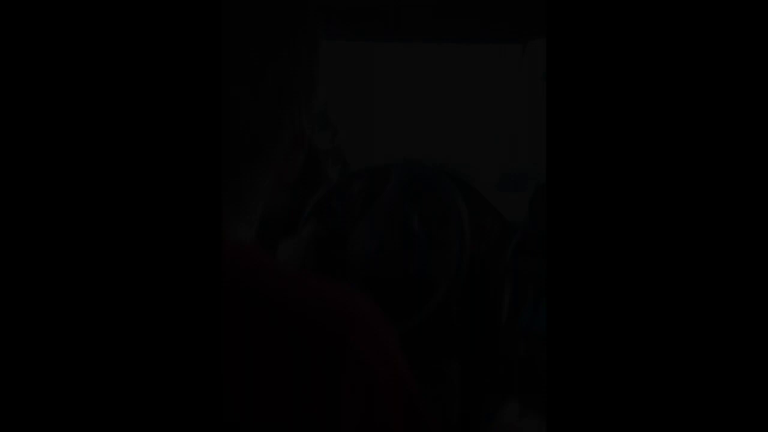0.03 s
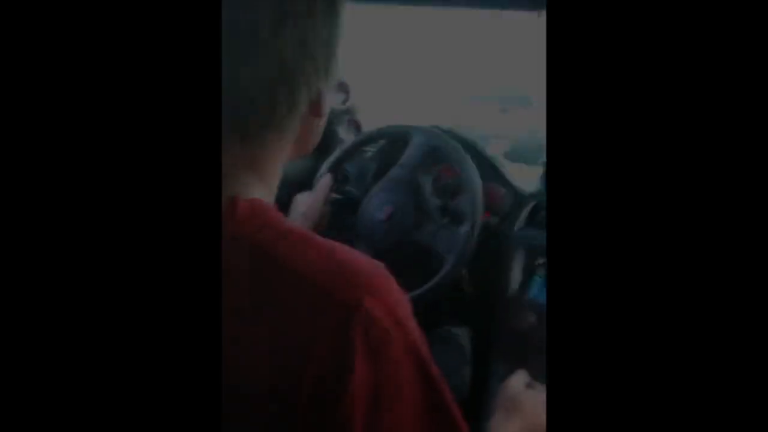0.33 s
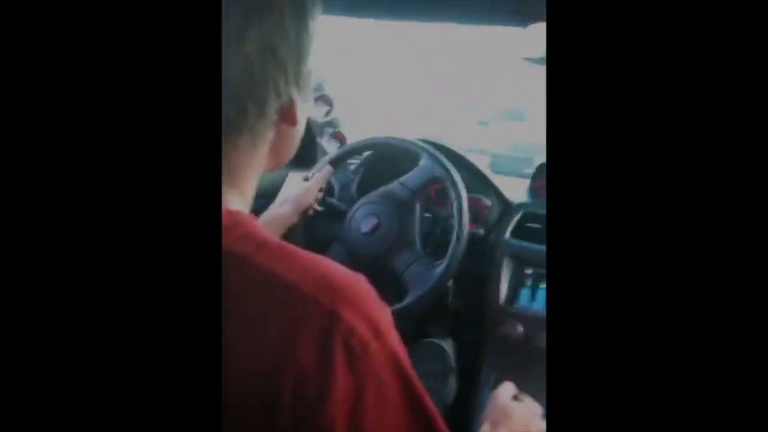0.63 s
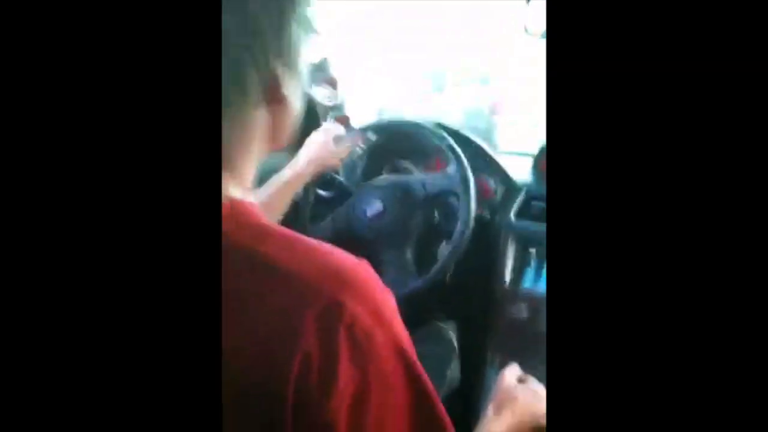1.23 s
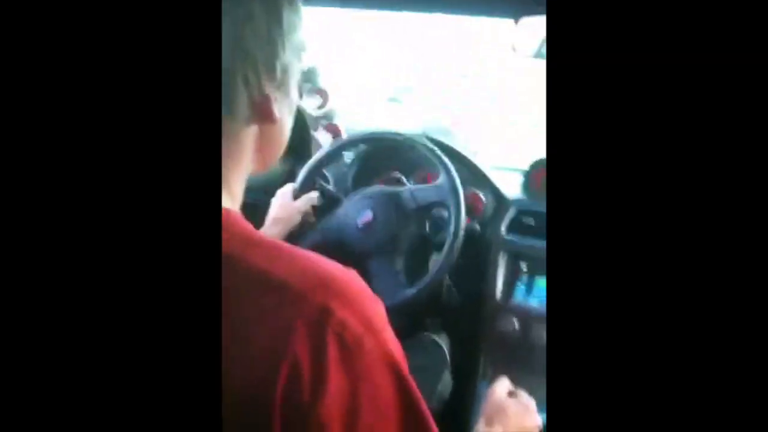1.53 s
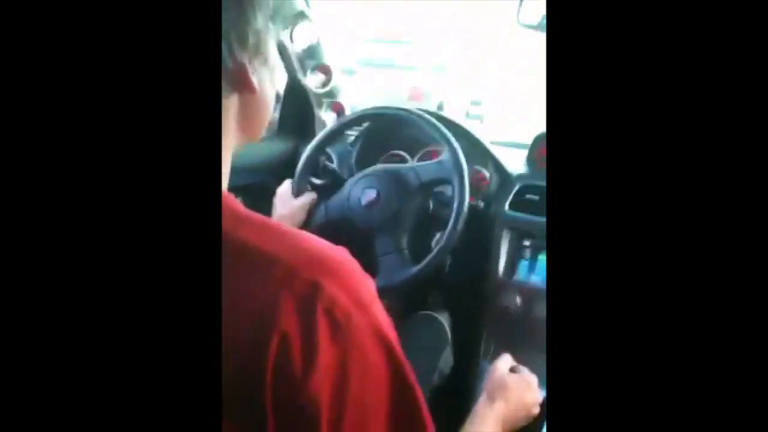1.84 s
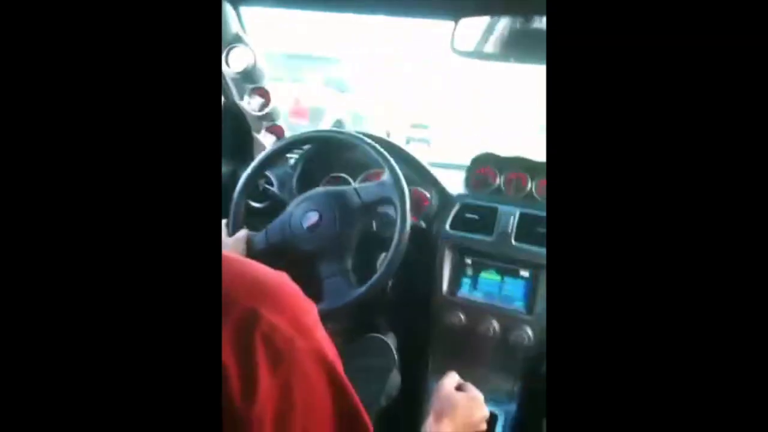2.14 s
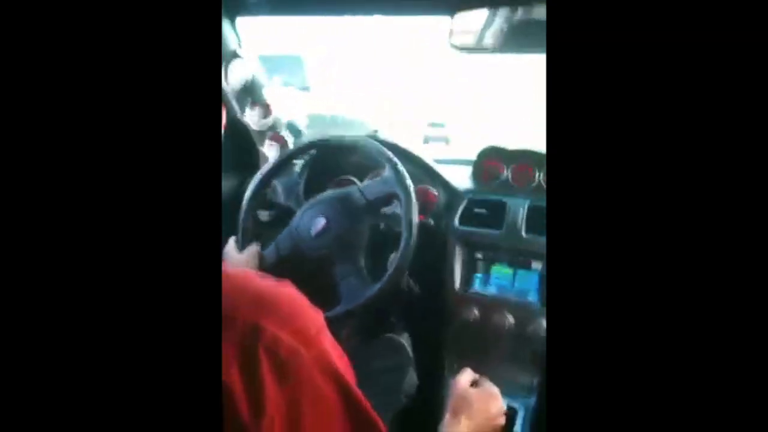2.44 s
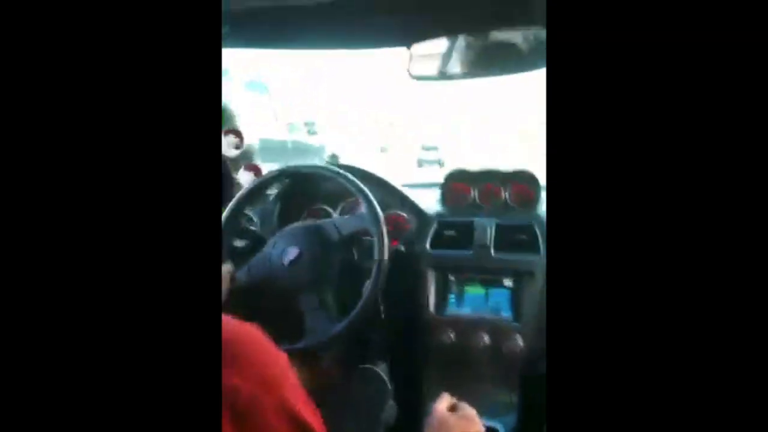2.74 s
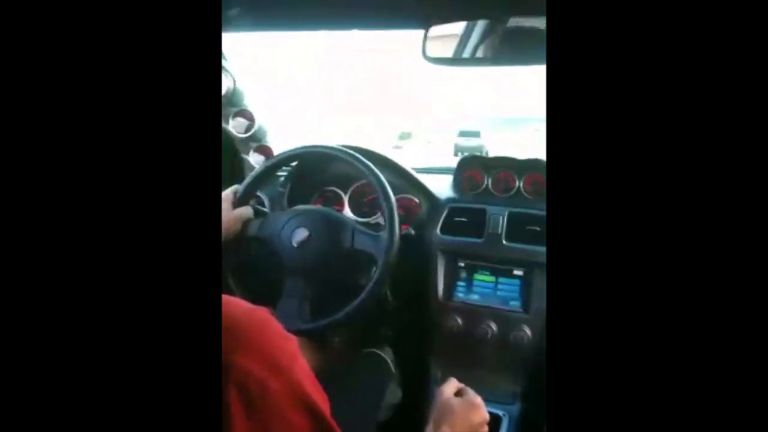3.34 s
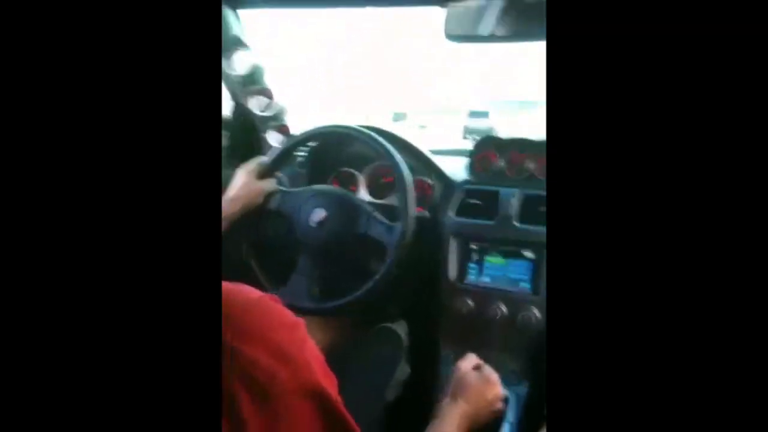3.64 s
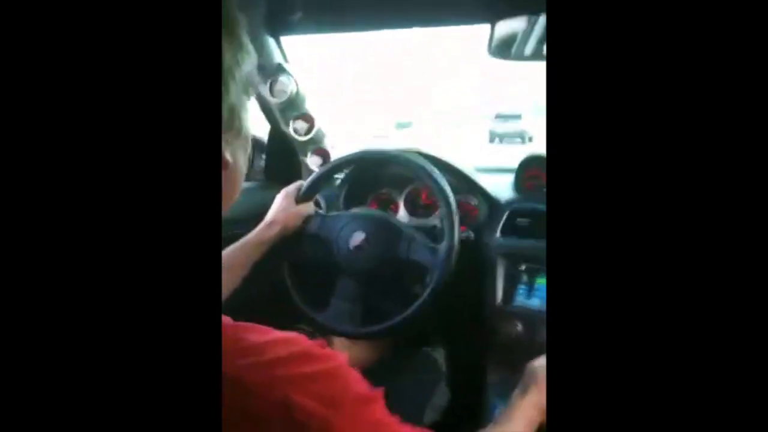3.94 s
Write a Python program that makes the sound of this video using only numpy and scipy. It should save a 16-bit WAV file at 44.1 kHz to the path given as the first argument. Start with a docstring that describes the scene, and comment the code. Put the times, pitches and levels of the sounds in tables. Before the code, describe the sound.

A turbocharged car engine fades in during the first second, heard inside the cabin, its drone rising steadily in pitch over road rumble. A thin turbo whistle climbs with it. From about 2.7 seconds a loud, rasping, hissy roar builds as the revs keep rising. At 3.7 seconds the throttle shuts: the roar drops sharply, air vents with a hiss, and the exhaust barks and burbles until 4 seconds.

```python
"""A turbocharged four-cylinder car pulls hard through one gear, heard in the cabin as the sound fades in.
The exhaust drones over road rumble while the turbo whistles upward; at full boost the wastegate
opens with a rasping roar. Then the throttle shuts: the roar dies, the blow-off valve hisses
and the exhaust barks and burbles."""
import sys
import numpy as np
from scipy import signal
from scipy.fft import rfft, irfft
from scipy.io import wavfile

SR = 44100
rng = np.random.default_rng(int(sys.argv[2]) if len(sys.argv) > 2 else 0)


def unload_wav(signal):
    """Save mono or channel-first audio to the path in sys.argv[1] as 16-bit WAV at rate SR, clipped to [-1, 1]."""
    wavfile.write(
        sys.argv[1],
        SR,
        np.round(np.clip(np.atleast_2d(signal).T, -1, 1) * 32767).astype(np.int16),
    )


N = 176400
TIME = np.arange(N) / SR
CYLINDERS = 4


def exhaust(cycle_hz, phase):
    """Harmonics of the engine cycle swell and sink as they sweep through the cabin's resonances."""
    # the drone: first three harmonics of the firing rate (time [s], level [dB])
    firing_tone = [(0.2, -19), (0.9, -20.5), (1.47, -16), (1.91, -16.5), (2.44, -27), (2.59, -46),
                   (2.8, -16.5), (2.98, -21.5), (3.16, -16.5), (3.65, -24), (3.7, -36), (3.73, -26),
                   (3.93, -27.5)]
    second_tone = [(0.3, -29.5), (1.06, -22), (1.2, -35.5), (1.28, -30), (2.17, -24), (2.49, -33),
                   (2.65, -29.5), (2.72, -40), (2.98, -28.5), (3.32, -42), (3.66, -25), (3.93, -63)]
    third_tone = [(0.3, -35), (1.66, -30), (1.88, -37), (2.28, -42.5), (2.59, -26.5), (3.08, -40),
                  (3.36, -41), (3.43, -47), (3.93, -54)]
    # lope of uneven cylinders, at 5, 6 and 10 times the cycle rate (time [s], level [dB])
    lope_5 = [(1.9, -67), (2.24, -27.5), (2.74, -28.5), (2.88, -40), (3.25, -22), (3.39, -33), (3.6, -31),
              (3.9, -63)]
    lope_6 = [(2.18, -36.5), (2.43, -22), (3, -39.5), (3.35, -43)]
    lope_10 = [(2.1, -48), (2.39, -34.5), (2.77, -42), (3, -22), (3.48, -31.5), (3.73, -43)]
    # the car body's filtering of the weaker harmonics (frequency [Hz], gain [dB])
    body = [(55, -62), (110, -64), (165, -30), (230, -25), (300, -21), (390, -21), (520, -22.5), (620, -25),
            (700, -27.5), (800, -24), (930, -18), (1030, -23), (1150, -37), (2000, -45)]
    # engine load, driving those weaker harmonics (time [s], gain [dB])
    load_level = [(0, -4.5), (.9, -7.5), (1.4, -2.5), (2, -4), (2.7, 1.5), (3.3, 0), (3.66, -3.5),
                  (3.78, -13), (4, -17)]
    loud = {5: lope_5, 6: lope_6, 8: second_tone, 10: lope_10, 12: third_tone}
    load = undb(curve(load_level))
    drone = undb(curve(firing_tone)) * tone(CYLINDERS * phase, flicker_db=.5)
    for k in range(2, 29):
        if k in loud:
            drone += undb(curve(loud[k])) * tone(k * phase, flicker_db=.95)
        elif k != CYLINDERS:
            rolloff_db = k * by_order(k, firing_db=1.04, crank_db=1.3, uneven_db=1.92)
            gain = load * response(body, k * cycle_hz) * undb(-rolloff_db)
            drone += gain * tone(k * phase, flicker_db=3.5, blur=.3)
    return drone


def wastegate(cycle_hz, phase):
    """Gas jets out in a puff per firing and rings the open pipe with a rasp."""
    # roar of the jet (frequency [Hz], level [dB])
    roar_colour = [(350, -30), (600, -6.5), (900, -8), (1220, -8), (1450, -8.5), (1600, -4.5), (1880, -4.5),
                   (2790, -9.5), (3400, -5.5), (3800, -6), (4620, -4), (6000, -6.5), (7330, -4.5),
                   (9000, -8), (12000, -7.5), (15500, -14)]
    # its envelope (time [s], level [dB])
    roar_level = [(2.1, -63), (2.5, -46), (2.75, -32.5), (2.87, -26), (3.05, -23.5), (3.25, -19.5),
                  (3.6, -18), (3.69, -18.5), (3.735, -29.5), (3.8, -35), (4, -58)]
    # bright hiss of the half-open gate (frequency [Hz], level [dB])
    opening_colour = [(3000, -20), (4000, -2), (4500, -10), (5400, 1), (6600, -4), (8200, -7), (9500, -20)]
    # pipe resonances (frequency [Hz], gain [dB])
    pipe = [(500, -34), (800, -22.5), (1150, -30), (1330, -15.5), (1430, -6.5), (1560, -14.5),
            (1850, -13.5), (2300, -18.5), (3000, -22), (4200, -30)]
    # envelope of the rasp (time [s], level [dB])
    rasp_level = [(2.4, -52), (2.83, -36), (2.97, -22), (3.22, -20), (3.42, -25), (3.63, -21.5), (3.7, -29),
                  (3.77, -55)]
    puffs = 1 + .15 * np.cos(CYLINDERS * phase)
    flutter = undb(.75 * walk(110))
    roar = noise(roar_colour) * undb(curve(roar_level))
    hiss = noise(opening_colour) * swell(at_s=3.055, width_s=.088, db=-25)
    rasp = np.zeros(N)
    for k in range(10, 68):
        gain = undb(by_order(k, firing_db=0, crank_db=-11.5, uneven_db=-23))
        rasp += gain * response(pipe, k * cycle_hz) * tone(k * phase, flicker_db=1.9)
    return (roar + hiss) * puffs * flutter + rasp * undb(curve(rasp_level))


def turbo():
    """A breathy, wavering whistle climbs with boost, a broader whirl just below it."""
    # the whistle spooling up (time [s], pitch [Hz], level [dB])
    spool = [(0, 4280, -62), (.6, 4930, -57), (1.15, 5950, -57), (1.5, 6750, -58), (1.9, 8000, -50),
             (2.2, 9080, -48), (2.5, 10350, -52), (2.78, 11700, -40), (3.05, 12900, -39),
             (3.35, 13900, -50), (3.7, 14000, -70)]
    # envelope of the whirl (time [s], level [dB])
    whirl_level = [(.5, -61), (1.3, -58), (1.8, -53), (2.3, -53), (2.7, -54), (3.1, -62)]
    waver, flicker_db, whirl_ratio = .005, 2.0, .885
    pitch_hz = curve(spool) * (1 + waver * walk(20))
    phase = 2 * np.pi * np.cumsum(pitch_hz) / SR
    whistle = breathy_tone(phase, width_hz=150)
    whistle *= undb(curve(spool, column=2) + flicker_db * walk(14))
    whirl = breathy_tone(whirl_ratio * phase, width_hz=280)
    whirl *= undb(curve(whirl_level) + flicker_db * walk(14))
    return whistle + whirl


def lift_off():
    """The throttle shuts: boost vents with a hiss and the exhaust barks and burbles."""
    # blow-off hiss, low burble and short bark (frequency [Hz], level [dB])
    hiss_colour = [(500, -16), (900, -6), (1300, -11), (2800, -4), (4700, 0), (8000, -2), (12000, -4),
                   (15500, -9)]
    burble_colour = [(60, -30), (115, -5), (175, 1), (205, -7), (245, 2), (320, -29), (390, -10), (500, -8),
                     (640, -36), (1200, -30)]
    bark_colour = [(400, -28), (480, -2), (520, -1), (560, -6), (650, -30)]
    # envelope of the hiss (time [s], level [dB])
    hiss_level = [(3.68, -70), (3.73, -38), (3.78, -31.5), (3.81, -25), (3.87, -27.5), (3.93, -29.5),
                  (4, -36)]
    lift_s, closing_s = 3.69, .06
    shut = np.clip((TIME - lift_s) / closing_s, 0, 1)
    hiss = noise(hiss_colour) * undb(curve(hiss_level))
    burble = noise(burble_colour) * undb(-28)
    bark = noise(bark_colour) * swell(at_s=3.8, width_s=.023, db=-26)
    return shut * (hiss + burble + bark)


def intake():
    """Air rushes into the engine with a broad, lightly flickering hiss."""
    # rushing air (frequency [Hz], level [dB])
    air_colour = [(500, -1), (1100, -1), (1400, -3), (1900, 2), (2500, -3), (3100, -1), (3800, -5),
                  (6000, -5.5), (8300, -7), (10500, -13), (15500, -23)]
    # its envelope (time [s], level [dB])
    air_level = [(0, -46.5), (1.1, -47), (1.6, -47), (2.3, -42), (2.8, -36), (4, -38)]
    return noise(air_colour) * undb(curve(air_level) + .6 * walk(18))


def cabin():
    """A bed of road rumble, with one bump in the road and two light ticks of trim."""
    # rumble, dull bump and bright ticks (frequency [Hz], level [dB])
    road_colour = [(25, -38), (55, -26.5), (90, -15), (135, -6.5), (210, 1), (290, -3.5), (420, -11),
                   (540, -13.5), (700, -28.5), (960, -21), (1250, -28), (2500, -49)]
    bump_colour = [(20, -6), (50, 3), (80, -12), (200, -38)]
    tick_colour = [(1500, -20), (4500, 0), (9000, 0), (15000, -8)]
    # envelope of the rumble (time [s], level [dB])
    road_level = [(0, -27.5), (1, -29.5), (2, -29), (2.5, -28), (3.2, -29), (3.7, -28), (4, -30.5)]
    # trim ticks (time [s], width [s], level [dB])
    tick_cues = [(0.37, .004, -47), (.872, .012, -52)]
    rumble = noise(road_colour) * undb(curve(road_level) + .68 * walk(10))
    bump = noise(bump_colour) * swell(at_s=3.22, width_s=.07, db=-48)
    ticks = noise(tick_colour) * sum(swell(*cue) for cue in tick_cues)
    return rumble + bump + ticks


def undb(db):
    """Decibels to gain."""
    return 10 ** (np.asarray(db) / 20)


def curve(rows, column=1):
    """One column of a time table at every sample."""
    rows = np.array(rows, float)
    return np.interp(TIME, rows[:, 0], rows[:, column])


def swell(at_s, width_s, db):
    """A bell-shaped rise and fall in level."""
    return undb(db) * np.exp(-.5 * ((TIME - at_s) / width_s) ** 2)


def response(points, hz):
    """Gain of an EQ curve at the given frequencies, falling away beyond its ends."""
    f, db = np.array(points, float).T
    hz = np.maximum(hz, 1)
    skirts = np.minimum(1, np.minimum(hz / f[0], f[-1] / hz)) ** 2
    return undb(np.interp(np.log(hz), np.log(f), db)) * skirts


def noise(colour):
    """Noise of rms 1 with the given colour."""
    white = rfft(rng.standard_normal(N))
    coloured = irfft(white * response(colour, np.fft.rfftfreq(N, 1 / SR)), N)
    return coloured / coloured.std()


def walk(rate, size=8192):
    """Random drift that glides to a new value rate times a second, with a spread of 1."""
    return np.interp(TIME * rate, np.arange(size), rng.standard_normal(size)) * np.sqrt(1.5)


def tone(phase, flicker_db, blur=0):
    """A partial of rms near 1 whose level flickers and whose phase wanders by blur radians."""
    start = 2 * np.pi * rng.random()
    return np.sqrt(2) * np.sin(phase + start + blur * walk(35)) * undb(flicker_db * walk(16))


def breathy_tone(phase, width_hz):
    """A narrow band of noise around a moving pitch."""
    return (walk(2 * width_hz) * np.cos(phase) + walk(2 * width_hz) * np.sin(phase)) / np.sqrt(2)


def by_order(k, firing_db, crank_db, uneven_db):
    """The value for cycle harmonic k: a firing harmonic, another crank harmonic, or neither."""
    return firing_db if k % CYLINDERS == 0 else crank_db if k % 2 == 0 else uneven_db


def scene():
    """Exhaust and wastegate follow the same revs; all layers meet in mono behind the driver."""
    # engine revs (time [s], firing rate [Hz])
    revs = [(0.0, 103), (0.2, 110), (0.6, 115.7), (1.0, 123), (1.4, 132), (1.8, 145), (2.0, 151),
            (2.4, 165.5), (2.8, 185.5), (3.2, 210), (3.6, 234.0), (3.74, 247), (4.0, 225)]
    jitter = .003004
    cycle_hz = curve(revs) * (1 + jitter * walk(45)) / CYLINDERS
    phase = 2 * np.pi * np.cumsum(cycle_hz) / SR
    engine = exhaust(cycle_hz, phase) + wastegate(cycle_hz, phase) + lift_off()
    mono = engine + cabin() + turbo() + intake()
    return np.array([mono, mono])


def record(dry):
    """Soft clipping rounds the loudest peaks; the sound fades in and a steep low-pass cuts its top."""
    ceiling, fade_s, top_hz = .58, .84, 15800
    rounded = dry / (1 + (dry / ceiling) ** 6) ** (1 / 6)
    fade = np.minimum(TIME / fade_s, 1) ** 2.03
    low_pass = signal.ellip(12, .1, 90, top_hz, fs=SR, output="sos")
    return signal.sosfilt(low_pass, rounded * fade)


dry = scene()
out = record(dry)
unload_wav(out)
```